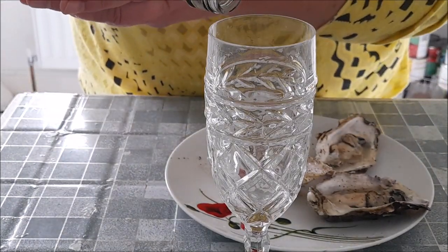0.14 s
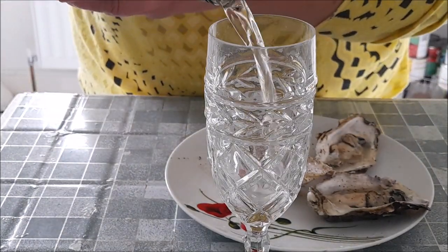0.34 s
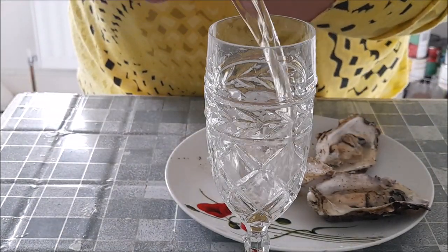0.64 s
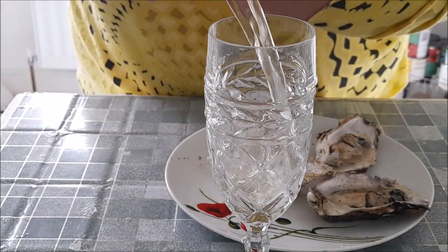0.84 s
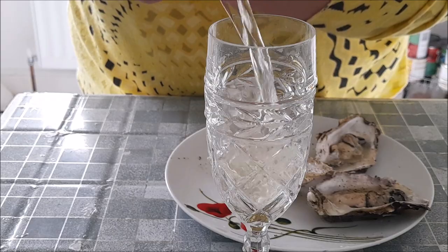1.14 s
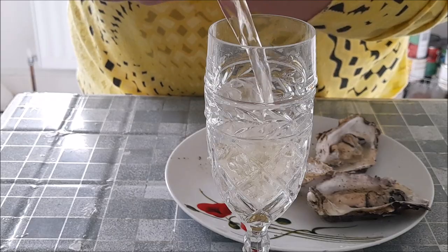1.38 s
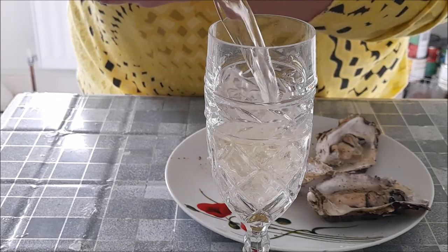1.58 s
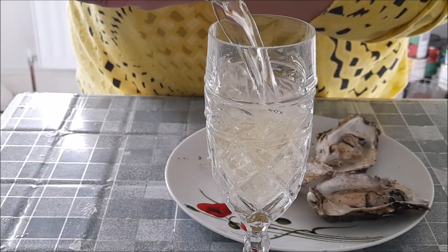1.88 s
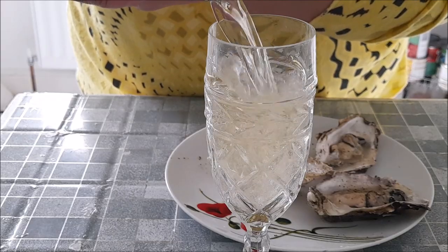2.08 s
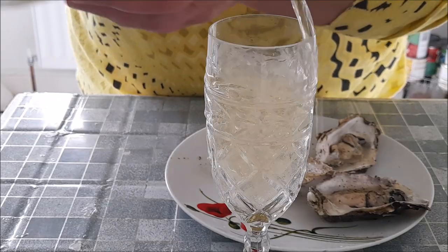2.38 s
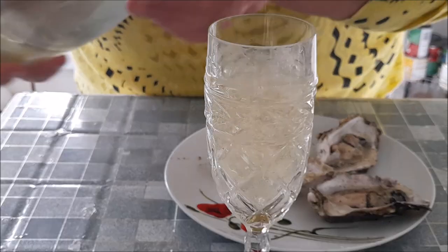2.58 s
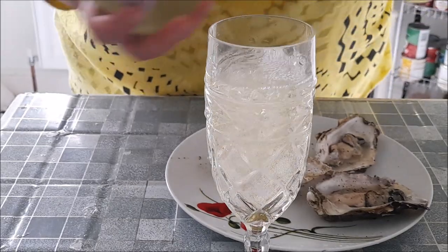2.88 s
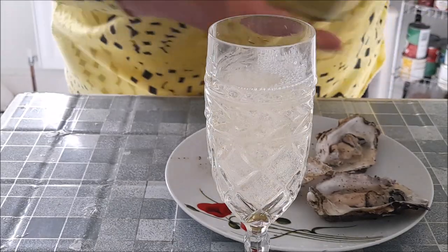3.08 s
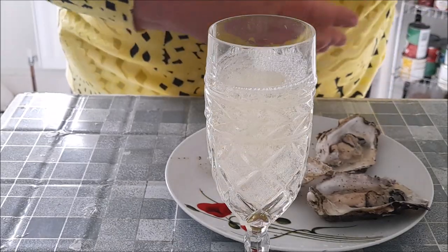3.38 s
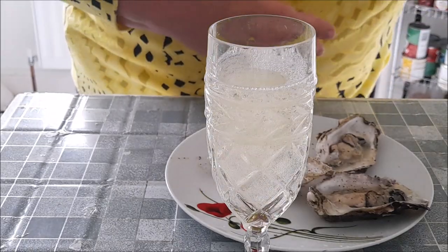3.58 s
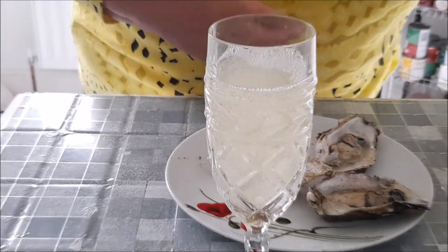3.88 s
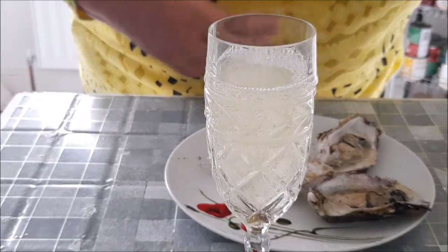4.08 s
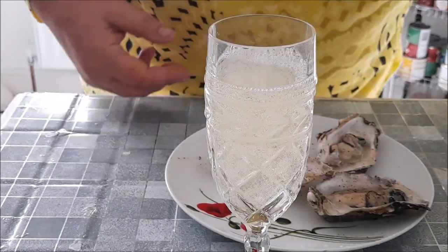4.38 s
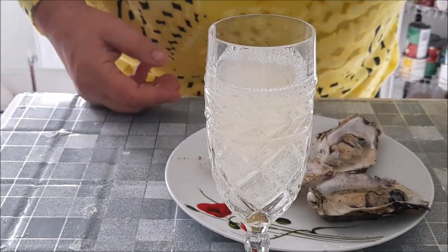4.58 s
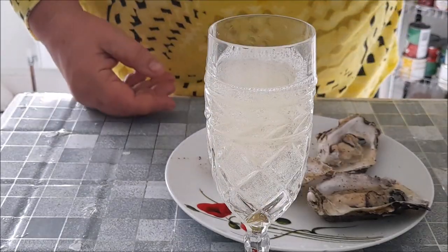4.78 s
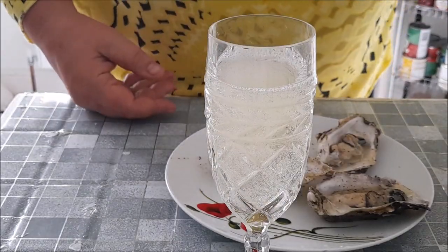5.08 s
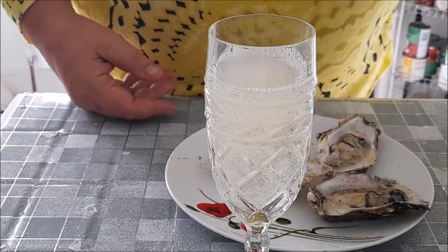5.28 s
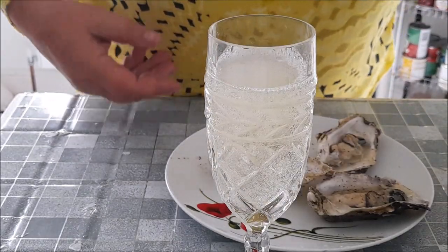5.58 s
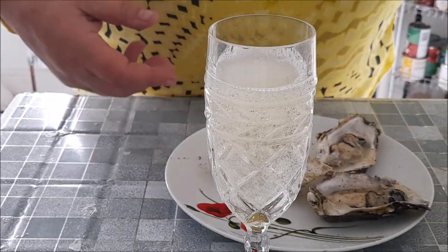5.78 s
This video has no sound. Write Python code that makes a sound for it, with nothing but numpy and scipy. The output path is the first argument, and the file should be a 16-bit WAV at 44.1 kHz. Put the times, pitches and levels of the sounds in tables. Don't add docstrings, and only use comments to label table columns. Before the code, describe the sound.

Close stereo recording on a kitchen table: a faint crockery clatter dies away over low rumble, then a lively gurgling stream fills a glass, weakening to separate drips. A crackle and crisp glass knocks end the pour. After near silence a bottle bangs down, by far the loudest sound, with quick rocking knocks, then dry clicks, muffled bumps and sleeve scuffing on the table, in a short hard room echo.

```python
import sys
import numpy as np
from scipy import signal
from scipy.fft import rfft, irfft
from scipy.io import wavfile
from scipy.ndimage import uniform_filter1d, map_coordinates

SR = 44100
rng = np.random.default_rng(int(sys.argv[2]) if len(sys.argv) > 2 else 0)


def inscribe(sig):
    pcm = np.round(np.clip(np.atleast_2d(sig).T, -1, 1) * 32767)
    wavfile.write(sys.argv[1], SR, pcm.astype(np.int16))


def level_to_linear(level):
    exponent = np.asarray(level, float) / 20
    return 10 ** exponent


N = 262026

# (time [s], flow level [dB], air column resonance [Hz], overtone [Hz])
FILLING = [
    (0.6, -84, 1350, 2700),
    (0.756, -59, 933, 2920),
    (0.828, -70, 1100, 2900),
    (1.022, -65.5, 1050, 3000),
    (1.192, -75, 1400, 3370),
    (1.544, -75, 1370, 3210),
    (1.93, -77.5, 1690, 4050),
    (2.218, -87, 1390, 3180),
    (2.36, -81, 1800, 2600),
    (2.55, -88, 1460, 2510),
]
# (frequency [Hz], t60 [s])
REVERBERATION = [(60, 0.22), (200, 0.4), (600, 0.38), (2000, 0.39), (5000, 0.38), (12000, 0.38)]
# (frequency [Hz], left-right likeness [-1 to 1])
COHERENCE = [(100, 1), (300, 0.92), (700, -0.12), (1200, -0.42), (2500, 0.17), (8000, 0)]


def unit(x):
    return x / np.sqrt(np.mean(x ** 2) + 1e-20)


def along(points, hz):
    f, v = np.transpose(points)
    return np.interp(np.log(hz + 1), np.log(f + 1), v)


def curves(rows, s):
    t, *cols = np.transpose(rows)
    return [np.interp(s, t, c) for c in cols]


def add(out, s, sound):
    part = out[..., round(s * SR):round(s * SR) + sound.shape[-1]]
    part += sound[..., :part.shape[-1]]


def flutter(per_s):
    values = rng.standard_normal(int(N / SR * per_s) + 4)
    return map_coordinates(values, [np.arange(N) / SR * per_s])


def noise(size, spectrum, alike, t60=None, patchy_db=0):
    hz, t, z = signal.stft(rng.standard_normal((2, size + 2048)), SR, nperseg=512)
    if patchy_db:
        patches = uniform_filter1d(rng.standard_normal(z.shape[1:]), 3, 0)
        z = z * level_to_linear(patchy_db * unit(uniform_filter1d(patches, 10, 1)))
    if t60:
        z = z * level_to_linear(-60 * t / along(t60, hz)[:, None])
    pair = rfft(signal.istft(z, SR, nperseg=512)[1][:, :size], size + 2048)
    hz = np.fft.rfftfreq(size + 2048, 1 / SR)
    turn = np.arccos(np.clip(along(alike, hz), -1, 1)) / 2
    mid, side = irfft(pair * level_to_linear(along(spectrum, hz)) * [np.cos(turn), np.sin(turn)])[:, :size]
    return unit(np.array([mid + side, mid - side]))


def rings(s, db, hz, t60, attack, rise=0, size=2048):
    t = np.arange(size) / SR
    s, db, hz, t60 = (np.reshape(v * np.ones(len(s)), (-1, 1)) for v in (s, db, hz, np.abs(t60)))
    envelope = level_to_linear(db - 60 * t / t60) * (1 - np.exp(-(t / attack) ** 2))
    wave = envelope * np.sin(2 * np.pi * hz * t * (1 + rise * t / t60))
    at = (s * SR).astype(int) + np.arange(size)
    return np.bincount(at.ravel(), wave.ravel(), N + size)[:N]


def echo(x, size=22050):
    tail = noise(size, [(20, -0.87), (9000, -1.1)], COHERENCE, REVERBERATION)
    tail = tail * (1 - np.exp(-np.arange(size) / SR / 0.0018))
    return signal.fftconvolve(x[None], tail / np.linalg.norm(tail[0]), axes=1)


def placed(x, pan_db, count):
    pair = np.array([np.roll(x, max(count, 0)), np.roll(x, max(-count, 0))])
    return pair * level_to_linear([[pan_db / 2], [-pan_db / 2]])


def kitchen():
    # (frequency [Hz], density [dB per Hz])
    floor_colour = [(12, -71), (20, -32.5), (27, -22), (48, -1), (86, -7), (120, -5), (160, -37.5),
                    (260, -120)]
    # (frequency [Hz], density [dB per Hz])
    drone_colour = [(59, -46), (100, -15.5), (172, -5.5), (204, -10), (265, -9.5), (358, -8), (387, -17.5),
                    (493, -19.5), (529, -27), (700, -25.5), (759, -33), (1100, -43), (1430, -74.5),
                    (2420, -120)]
    # (frequency [Hz], density [dB per Hz])
    hiss_colour = [(470, -36.5), (800, -2.5), (943, -9.5), (979, -5.5), (1180, -9.5), (1290, -4.5),
                   (1750, -14.5), (2520, -9), (3050, -13), (7370, -13.5), (10400, -4), (15100, -9.5),
                   (16300, -8.5)]
    # (frequency [Hz], density [dB per Hz])
    clatter_colour = [(240, -54), (400, -7.5), (710, -1), (945, -17.5), (1040, -10), (1490, 1), (1770, -12),
                      (2200, 5), (2790, -11), (4230, -11), (7120, -34), (7800, -67), (9000, -27),
                      (11700, -65), (19800, -120)]
    # (frequency [Hz], level [dB])
    motor_tones = [(64.6, -69.5), (177.6, -73.5), (263.8, -77), (344.5, -73.5)]
    # (frequency [Hz], left-right likeness [-1 to 1])
    likeness = [(60, 0.98), (180, 0.65), (550, 0.37), (1650, 0.52), (4970, -0.44), (15000, -0.39)]
    # (frequency [Hz], left over right [dB])
    balance = [(60, -5.5), (180, -5), (550, -2), (1650, -1), (4970, -2), (15000, 2.5)]
    # (time [s], level [dB])
    shaking = [(0, 18.5), (0.59, 1.5), (1.34, -1.5), (3.3, -2.5), (3.6, -1.5), (3.9, 10), (4.2, 5.5),
               (4.66, -10.5), (5.94, 14.5)]

    t = np.arange(N) / SR
    stir_db, = curves(shaking, t)
    rock_db = np.interp(t, [3.87, 3.99, 4.23], [0, 18, 0])
    rumble_db = -74.5 + stir_db
    drone_db = -67.5 + 0.54 * stir_db + rock_db
    x = level_to_linear(rumble_db) * noise(N, floor_colour, likeness, patchy_db=2.0)
    x += level_to_linear(drone_db) * noise(N, drone_colour, likeness, patchy_db=3.0)
    x += level_to_linear(-80) * noise(N, hiss_colour, likeness, patchy_db=1.5)
    for hz, db in motor_tones:
        x += level_to_linear(db - 4.0) * np.sin(2 * np.pi * hz * t)
    clatter_t60 = [(500, 3.4), (1400, 0.55), (2300, 0.7), (5000, 0.61)]  # (Hz, s)
    add(x, 0, level_to_linear(-68.5) * noise(SR, clatter_colour, COHERENCE, clatter_t60))
    tilt_db = along(balance, np.fft.rfftfreq(N, 1 / SR)) * [[.5], [-.5]]
    return irfft(rfft(x) * level_to_linear(tilt_db), N)


def sleeve():
    # (time [s], level [dB])
    drag = [(5, -100), (5.05, -74.5), (5.22, -84.5), (5.3, -95), (5.33, -66.5), (5.47, -66.5),
            (5.56, -67.5), (5.68, -84.5), (5.78, -86), (5.82, -72), (5.94, -74.5)]
    # (frequency [Hz], density [dB per Hz])
    cloth_colour = [(300, -40), (600, -3), (1200, 1), (2400, -6), (4500, -4), (5000, -11.5), (9000, -20),
                    (16000, -40)]
    return level_to_linear(curves(drag, np.arange(N) / SR)[0]) * noise(N, cloth_colour, COHERENCE, patchy_db=4.5)


def thumps():
    # (time [s], peak level [dB], frequency [Hz])
    contacts = [(2.61, -42.5, 343), (4.439, -49, 162.6), (5.165, -41, 162.8), (5.18, -46, 165),
                (5.312, -45.5, 159), (5.382, -30.5, 184), (5.41, -34, 158), (5.434, -36, 169),
                (5.477, -41.5, 183), (5.525, -39.5, 169), (5.546, -40, 217), (5.589, -32.5, 171),
                (5.618, -42, 174), (5.764, -34.5, 200), (5.807, -38, 180), (5.91, -39.5, 151)]
    s, db, hz = np.transpose(contacts)
    x = rings(s - .003, db + 12.5, hz, 0.042, attack=0.012, size=6000)
    x += rings(s, db - 11.5, 1.797 * hz, 0.059, attack=0.0026, size=6000)
    x += rings(s, db - 14.5, 3.03 * hz, 0.022, attack=0.0026, size=6000)
    return placed(x, -2.1, count=6) + level_to_linear(-11) * echo(x)[:, :N]


def bottle():
    # (time [s], boom level [dB], crack level [dB])
    blows = [
        (3.8334, -11.5, -26.5),
        (3.873, -11.5, -36),
        (3.988, -14.5, -42),
        (4.024, -20, -62),
        (4.099, -29, -64),
        (4.12, -31, -68),
    ]
    # (frequency [Hz], level [dB], t60 [s])
    table_modes = [(109, -4.5, 0.87), (136.4, -1.5, 0.65), (161, 11, 0.36), (217.5, 2, 0.52),
                   (365.5, -6.5, 1), (502.2, -9, 0.55), (540.7, -6.5, 0.78), (750, -10.5, 0.3),
                   (691, -10, .5), (954, -10, 0.43), (1247, -14.5, .35), (1481, -15.5, 0.24),
                   (2210, -18, 0.37)]
    # (frequency [Hz], density [dB per Hz])
    bang_colour = [(180, -26.5), (300, -5.5), (378, -9), (415, -13), (531, -3), (680, -3.5), (1050, -10),
                   (1260, -11), (3090, -31), (12000, -60.5), (15600, -84.5), (22000, -120)]

    out, boom, t = np.zeros((2, N)), np.zeros(N), np.arange(SR // 2) / SR
    hz, db, t60 = np.transpose(table_modes)[:, :, None]
    for s, boom_db, crack_db in blows:
        hardness_db = (crack_db - boom_db + 13) * hz / 1500
        level_db = db + rng.normal(0, 1.5, db.shape) + hardness_db
        decay_db = 60 * t / np.minimum(0.28 * t60, .3)
        ring = np.sum(level_to_linear(level_db - decay_db) * np.sin(2 * np.pi * hz * t), axis=0)
        swing = -level_to_linear(crack_db + 23.5 - 60 * t / .008) * np.sin(2 * np.pi * 560 * t)
        swing = swing * (1 - np.exp(-t / .0005))
        add(boom, s + 0.003615, level_to_linear(boom_db - 11) * ring * (1 - np.exp(-t / 0.0037)) + swing)
        bang = noise(len(t), bang_colour, COHERENCE, REVERBERATION) * level_to_linear([[-.7], [.7]])
        add(out, s + 0.0033, level_to_linear(crack_db - 7.3) * (1 - np.exp(-t / 0.0036)) * bang)
    buzz_colour = [(7500, -41.0), (9000, -0.5), (14500, -9.0), (16000, -25.5)]
    buzz = noise(len(t), buzz_colour, COHERENCE, [(9000, 3.3)])
    add(out, blows[0][0], level_to_linear(-73) * buzz * np.cos(t / t[-1] * np.pi / 2))
    return out + placed(boom, -1.6, count=5) + level_to_linear(-4) * echo(boom)[:, :N]


def bump(hz):
    return [(.12 * hz, -45), (.5 * hz, -17), (.82 * hz, -7), (hz, 0), (1.2 * hz, -5), (1.6 * hz, -20), (3 * hz, -45)]


def tap(s, db, spectrum, tail_db, t60):
    t = np.arange(9200) / SR
    body = noise(len(t), spectrum, COHERENCE, REVERBERATION) * np.cos(t / t[-1] * np.pi / 2) ** .5
    hit = body[0] * (1 - np.exp(-(t / 0.0002) ** 2)) * level_to_linear(-60 * t / t60)
    far = s > 4.3
    direct = placed(hit / np.abs(hit).max(), -7 if far else -2, count=10 if far else -3)
    tail = (1 - np.exp(-(t / .01) ** 2)) * body
    return level_to_linear(db) * (level_to_linear(2) * direct + level_to_linear(tail_db) * tail)


def taps():
    # (time [s], body level [dB], body frequency [Hz], edge level [dB])
    dry_taps = [(2.5905, -47, 1600, -52), (2.6115, -42, 2220, -30), (2.6835, -66, 4540, -58),
                (5.318, -50.5, 3370, -43.5), (5.911, -54, 4100, -51), (5.8845, -55, 3400, -49.5),
                (2.7135, -42.5, 4200, -66), (4.4594, -45.5, 2750, -60), (4.487, -42, 3300, -59),
                (5.1037, -59, 3587, -56), (5.4098, -50.5, 3400, -63), (5.503, -41.5, 3500, -54)]
    # (time [s], body level [dB], body frequency [Hz], edge level [dB])
    dragging_taps = [(2.614, -58, 1800, -47), (2.576, -57.5, 1300, -70), (2.7074, -49, 3620, -56.5),
                     (2.9902, -60, 4300, -73), (4.494, -51.5, 3700, -73), (5.5, -65, 3306, -73),
                     (5.0402, -54, 3530, -51.5), (5.3121, -54.5, 4250, -50.5), (2.709, -60, 3320, -70),
                     (5.4812, -57, 2900, -58), (5.5134, -48, 3460, -70), (5.7897, -64, 3500, -76),
                     (5.8045, -60, 3800, -64), (5.8176, -61, 3400, -64), (2.822, -57, 3320, -70)]
    # (time [s], level [dB], frequency [Hz])
    low_sides = [
        (2.611, -53, 700),
        (4.487, -59.5, 1480),
        (5.041, -71, 1302),
        (5.318, -65.5, 915),
        (5.382, -64, 800),
        (5.503, -58.5, 1150),
    ]
    # (time [s], level [dB], frequency [Hz])
    high_sides = [
        (2.5785, -56, 5160),
        (2.59, -47.5, 4750),
        (2.6853, -47, 6700),
        (2.9903, -52.5, 6550),
        (4.4595, -53, 4840),
        (4.4875, -50, 6980),
        (5.5029, -53, 6700),
        (5.8154, -55.5, 6970),
        (5.9116, -50, 6900),
    ]
    # (frequency [Hz], density [dB per Hz])
    edge_colour = [(4710, -20.5), (8000, -15), (11000, -5.5), (14000, -10.5), (16200, -28)]
    # (frequency [Hz], density [dB per Hz])
    foil_colour = [(4710, -54), (8000, -26), (9300, -13), (11400, -10), (15600, 5.5)]
    # (frequency [Hz], gain [dB])
    crockery = [(2800, 0.5), (3350, 2), (3650, -1), (4000, 1.5), (4250, 0.5), (4550, 2.5), (4800, -3.5),
                (6500, 1.5), (8000, 0.5)]

    out = np.zeros((2, N))
    for rows, body_tail_db, edge_tail_db in ((dry_taps, -23.5, -25.5), (dragging_taps, -13.5, -19)):
        for s, db, hz, edge_db in rows:
            bright = edge_colour if s > 2.65 else foil_colour
            add(out, s, tap(s, db - 3, bump(hz), body_tail_db, .014))
            add(out, s, tap(s, edge_db + 4, bright, edge_tail_db, .009))
    for rows, tail_db in ((low_sides, -12.5), (high_sides, -23)):
        for s, db, hz in rows:
            add(out, s, tap(s, db, bump(hz), tail_db, .016))
    return irfft(rfft(out) * level_to_linear(along(crockery, np.fft.rfftfreq(N, 1 / SR))), N)


def glass_knocks():
    # (time [s], peak level [dB], frequency [Hz])
    knocks = [(2.5885, -45, 1600), (2.5895, -50, 5030), (2.6107, -42, 1960), (2.6115, -49, 1235),
              (2.612, -48.5, 2390), (2.6115, -48.5, 3260), (2.612, -43, 4900), (2.6135, -51.5, 525),
              (2.7124, -38, 3610), (2.716, -37, 4400), (5.413, -49, 3430), (5.819, -44, 3450)]
    s, db, hz = np.transpose(knocks)
    return placed(rings(s, db + 0.5, hz, 30 / hz, attack=0.00036, size=3000), -2.3, count=-3)


def glass_rings():
    # (time [s], level [dB], frequency [Hz], t60 [s])
    faint_rings = [(.2, -72, 591.5, 1.8), (1.51, -68, 1027, 0.17), (2.42, -74, 633, 0.33),
                   (2.708, -62, 2600, .12), (2.708, -62, 3290, .2), (2.709, -62, 3570, .22),
                   (2.709, -59, 4370, .15), (2.824, -66, 3400, .2), (2.822, -68, 3060, .15),
                   (2.992, -68, 4400, .2), (2.992, -75, 3400, .15), (2.612, -62, 2430, .2),
                   (2.612, -63, 1900, .15), (4.49, -64, 3600, .2), (4.49, -66, 4150, .2),
                   (4.49, -67, 2800, .2), (4.49, -70, 7200, .2), (5.504, -62, 3360, .25),
                   (2.713, -63, 3919, .4), (2.715, -68, 4170, 0.3), (2.714, -66, 4300, 0.35),
                   (2.713, -72, 3499, .5), (5.817, -68, 3470, 0.36), (2.82, -65.5, 1750, 0.13),
                   (2.822, -75, 2076, 0.19), (2.823, -65, 3250, 0.22), (5.05, -71.5, 876, 0.18),
                   (5.316, -63.5, 3370, 0.3)]
    # (time [s], length [s], level [dB], frequency [Hz])
    squeaks = [
        (2.765, .145, -70, 1359),
        (2.82, .08, -76, 2076),
    ]
    s, db, hz, t60 = np.transpose(faint_rings)
    x = rings(s, db, hz, t60, attack=0.0018, size=16000)
    x += rings(s + .004, db, 1.012 * hz, t60, attack=.012, size=16000)
    for s, length, db, hz in squeaks:
        t = np.arange(round(length * SR)) / SR
        level = level_to_linear(db + 2.5 * np.sin(2 * np.pi * 23 * t)) * np.sin(np.pi * t / length) ** .4
        vibrato = .6 * np.sin(2 * np.pi * 17 * t)
        add(x, s, level * np.sin(2 * np.pi * hz * t + vibrato))
    return level_to_linear(-3) * x + level_to_linear(-6.5) * echo(x)[:, :N]


def stream(column, count, scatter, t60, spread_db, size):
    draw = rng.random((count, 3))
    start = FILLING[0][0] + .05
    s = start + draw[:, 0] * (FILLING[-1][0] - start)
    hz = column(s) * np.exp(scatter * (draw[:, 1] + draw[::-1, 1] - 1))
    db = -spread_db * np.log(draw[:, 2] + .03)
    x = rings(s, db, hz, t60, attack=t60 / 12, rise=.02, size=size)
    return x / np.sqrt(np.abs(uniform_filter1d(x ** 2, 4000)) + 0.028 * np.mean(x ** 2))


def air_column(s):
    return curves(FILLING, s)[1]


def overtone(s):
    return curves(FILLING, s)[2]


def jet():
    t = np.arange(N) / SR
    flow_db = curves(FILLING, t)[0] + 3 * flutter(30)
    foam_db = 9.5 * (t - FILLING[0][0])
    splash_db = np.interp(t, (.64, .665, .74, .8), [0, 6.5, 6.5, 0])
    spray_db = -69 + 0.5 * (flow_db + 65.5) - foam_db + splash_db
    x = level_to_linear(flow_db - 16.5) * stream(air_column, count=360, scatter=0.07, t60=0.022, spread_db=6, size=1500)
    x += level_to_linear(flow_db - 8.0) * stream(overtone, count=800, scatter=0.31, t60=0.0082, spread_db=4.5, size=500)
    x += level_to_linear(flow_db - 8.5) * stream(lambda s: 4500, count=900, scatter=0.16, t60=0.0087, spread_db=6.0, size=400)
    x += level_to_linear(flow_db - 12) * stream(lambda s: 1300, count=250, scatter=0.4, t60=0.0061, spread_db=-0.5, size=700)
    x += level_to_linear(spray_db) * stream(lambda s: 8800, count=2500, scatter=.6, t60=.0024, spread_db=3, size=96)
    return x


def bubbles(rows, cycles, **shape):
    s, db, hz = np.transpose(rows)
    return rings(s, db, hz, cycles / hz, **shape)


def froth(rows, cycles):
    s, db, hz = np.repeat(rows, 5, axis=0).T
    delay, weakness, detune = rng.random((len(s), 3)).T
    late_s = s + .03 * delay
    weak_db = db - 12 - 9 * delay - 6 * weakness
    near_hz = hz * np.exp(0.085 * (2 * detune - 1))
    return bubbles(np.transpose([late_s, weak_db, near_hz]), cycles, attack=0.001, rise=0.03, size=1024)


def single_drops():
    # (time [s], peak level [dB], frequency [Hz])
    big = [(0.65, -45.5, 1390), (0.652, -54, 950), (0.697, -50, 1590), (0.751, -49, 990),
           (0.768, -31.5, 986), (0.795, -43, 997), (0.812, -41, 1056), (0.83, -43, 1090),
           (0.852, -43, 1120), (0.869, -38, 1023), (0.886, -42.5, 1040), (0.905, -40, 1050),
           (0.928, -39.5, 1110), (0.944, -39, 1103), (0.975, -34.5, 1057), (1.017, -46, 1084),
           (1.083, -47, 1080), (1.245, -52, 1450), (1.289, -51.5, 1450), (1.359, -40.5, 1440),
           (1.455, -55, 1250), (1.471, -41, 1337), (1.519, -41, 1304), (1.652, -42, 1387),
           (1.691, -46.5, 1450), (1.947, -44, 1520), (1.966, -37.5, 1670), (2.325, -54, 1810),
           (2.541, -50, 1590), (1.2087, -58, 1570), (1.3239, -60, 1420), (1.4172, -60, 1480),
           (1.522, -51.5, 1030), (1.54, -52, 1410), (1.5814, -61, 1070), (1.6038, -55, 1310),
           (1.6203, -60, 1350), (1.6407, -51, 1350), (1.725, -58, 1540), (1.7594, -59, 1560),
           (1.7754, -58, 1430), (1.8233, -65, 1430), (2.0742, -60, 1680), (0.958, -52, 1050),
           (0.99, -47, 1005), (1.035, -50, 1100), (1.105, -49, 1113), (2.574, -48, 1550)]
    # (time [s], peak level [dB], frequency [Hz])
    small = [(0.701, -46, 2500), (0.751, -42, 3100), (0.752, -40, 4700), (0.779, -41.5, 2890),
             (0.927, -52, 2900), (0.973, -47, 3150), (1.0015, -52, 4330), (1.0099, -43, 3320),
             (1.022, -50, 3020), (0.7091, -48, 2670), (0.728, -53, 2480), (0.77, -53, 4600),
             (0.79, -53, 4500), (0.8598, -53, 2860), (0.945, -58, 3000), (0.985, -50, 2860),
             (1.112, -55, 3160), (1.1945, -63, 2930), (1.36, -56, 2970), (1.526, -50, 4200),
             (1.725, -55, 4060), (1.0433, -52, 3040), (1.075, -54, 2760), (1.0968, -50.5, 2980),
             (1.209, -53.5, 3050), (1.2898, -59, 3260), (1.3213, -54, 3470), (1.4734, -40.5, 2920),
             (1.641, -51, 4170), (1.816, -65, 2900), (1.9109, -50, 4150), (1.9298, -47.5, 4100),
             (2.087, -50, 4100), (1.985, -61, 2400), (2.137, -59, 4470), (2.4138, -67, 2600)]
    # (time [s], peak level [dB],
    # frequency [Hz])
    bursts = [(0.558, -53.5, 9460), (0.6725, -46.5, 7800), (0.712, -44.5, 10300), (0.8316, -56, 12000),
              (0.848, -54, 10300), (1.074, -59, 7060), (0.752, -50, 6870), (1.2052, -48.5, 13500),
              (1.235, -57.5, 10000), (1.29, -57, 10200), (1.326, -56, 12600), (.936, -58, 7800),
              (.976, -58, 7000), (1.117, -60, 9500), (1.163, -62, 7000), (1.28, -62, 9000),
              (1.36, -62, 10500), (1.4754, -58, 5750), (1.476, -61, 9500), (1.476, -63, 13500),
              (1.528, -61, 8800), (1.642, -63, 9000), (1.677, -64, 10500), (1.77, -64, 6500),
              (1.815, -61, 6500), (1.935, -62, 6800), (.651, -58, 12000), (.665, -54, 9700),
              (.89, -60, 11000), (2.21, -66, 6800), (2.405, -66, 13000), (1.8238, -56.5, 10400),
              (2.4626, -64, 6500), (2.5535, -50, 9100), (2.5665, -57, 11200), (2.578, -38, 9830)]
    x = bubbles(big, 28.7, attack=0.004, rise=0.012)
    x += bubbles(small, 44, attack=0.001, rise=0.032)
    x += froth(big, 24) + froth(small, 35)
    for ratio, splash_db in ((1.45, -4.5), (2.1, -14)):
        x += level_to_linear(splash_db) * bubbles(np.multiply(small, [1, 1, ratio]), 18, attack=0.00017, size=512)
    for ratio, side_db in ((.8, -3), (1, 11), (1.25, 2)):
        x += level_to_linear(side_db) * bubbles(np.multiply(bursts, [1, 1, ratio]), 36, attack=0.00022, size=512)
    return x


def pour():
    x = jet() + single_drops()
    x[round(FILLING[-1][0] * SR) + 2000:] = 0
    return placed(x, -3.5, count=-3) + level_to_linear(-3.5) * echo(x)[:, :N]


def scene():
    background = kitchen()
    heavy = thumps() + bottle()
    handling = sleeve() + taps() + glass_knocks() + glass_rings()
    chatter_db = 1.1 * flutter(140) - .1
    return background + heavy + level_to_linear(chatter_db) * handling + pour()


def low_pass(x):
    return signal.sosfilt(signal.butter(12, 16480, fs=SR, output="sos"), x)


def record(dry):
    hz = np.fft.rfftfreq(N, 1 / SR)
    response = [(40, -8.5), (55, -0.5), (7200, 4.5), (8400, -7), (8850, 1.0), (15000, -1.5),
                (16000, -13), (16500, -43.0)]
    lean_db = along([(6500, 0.1), (9000, 4.5)], hz) * [[.5], [-.5]]
    mix = irfft(rfft(dry) * level_to_linear(along(response, hz) + lean_db), N)
    return low_pass(mix)


dry = scene()
out = record(dry)
inscribe(out)
```